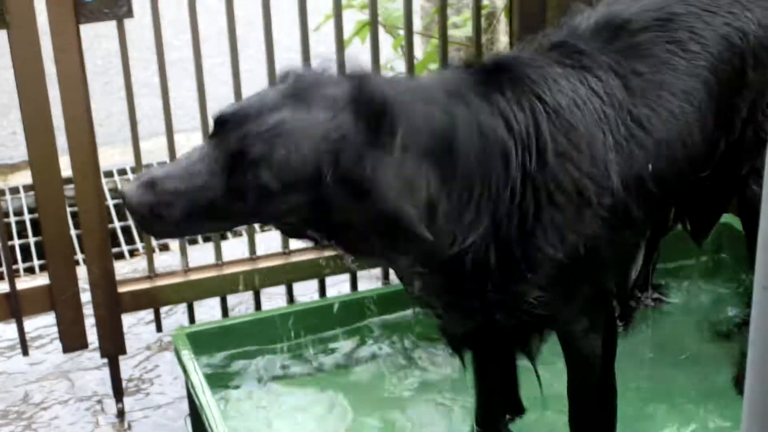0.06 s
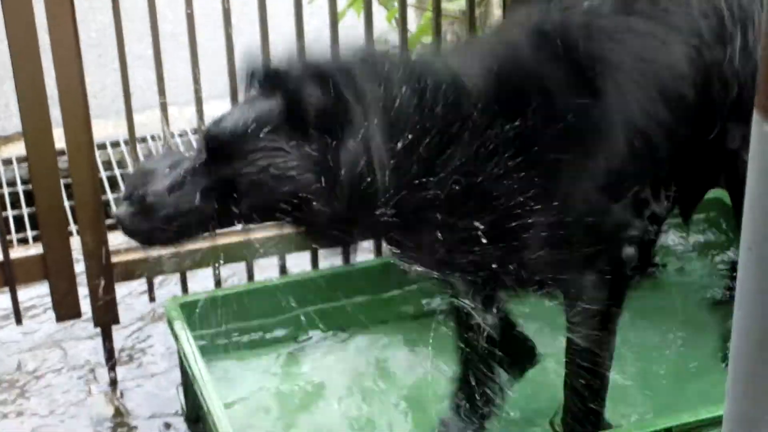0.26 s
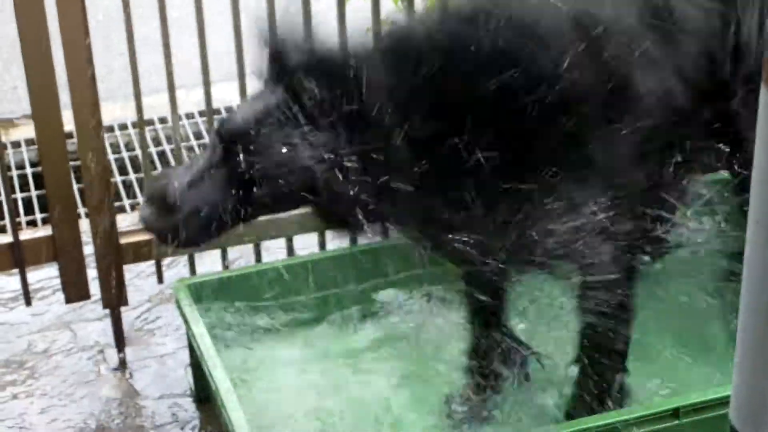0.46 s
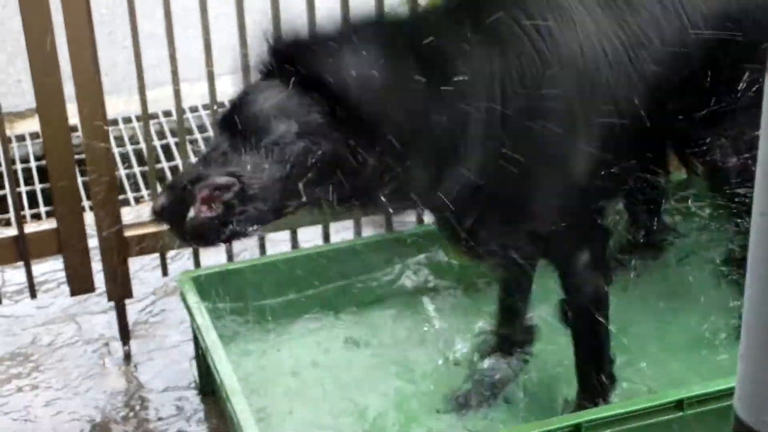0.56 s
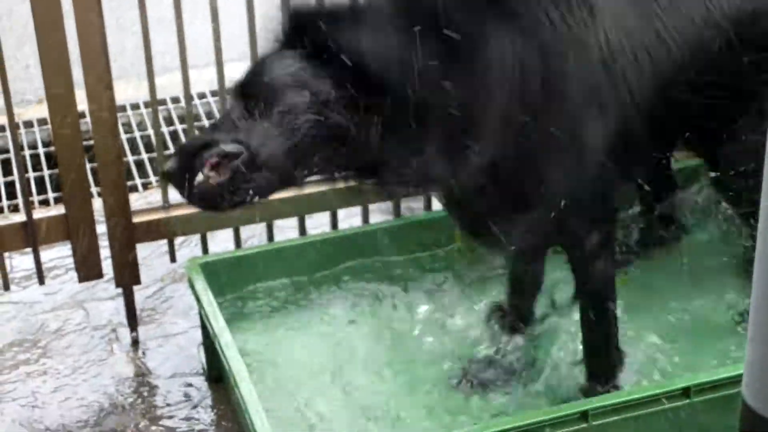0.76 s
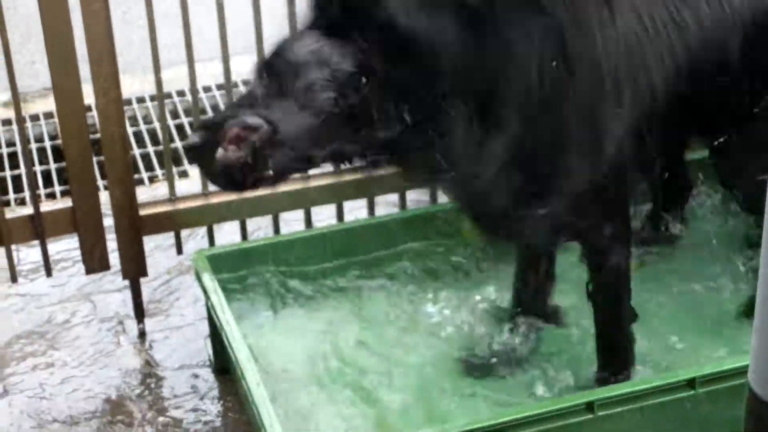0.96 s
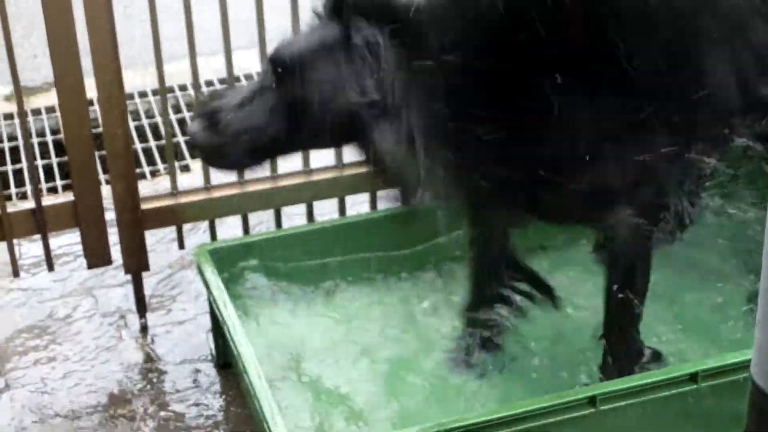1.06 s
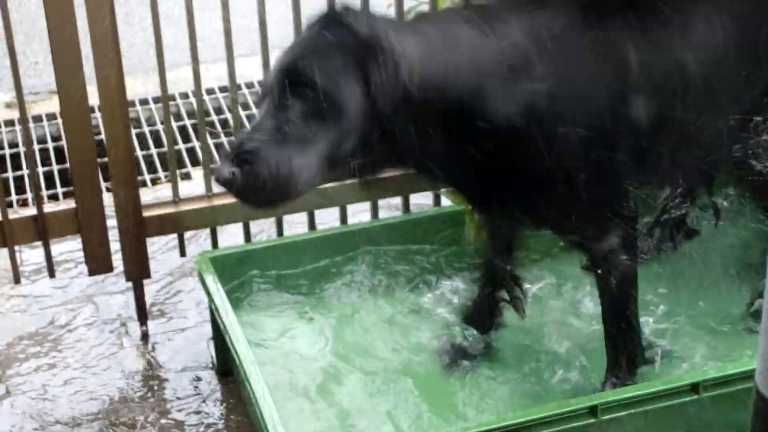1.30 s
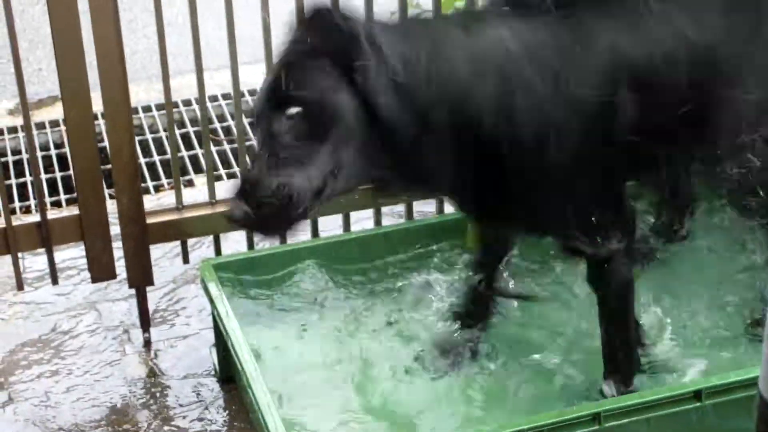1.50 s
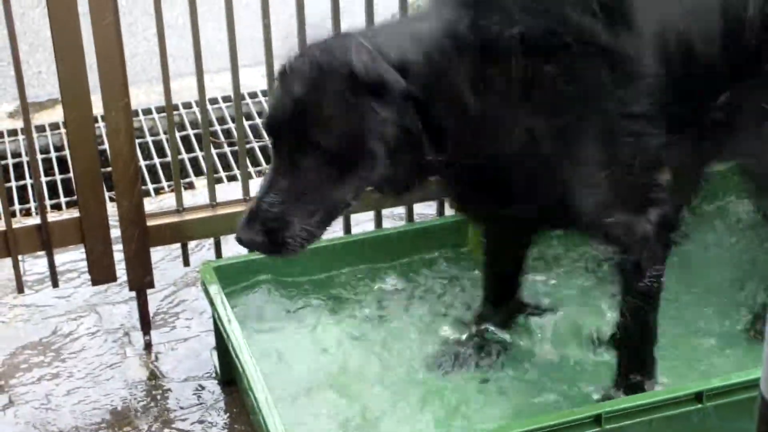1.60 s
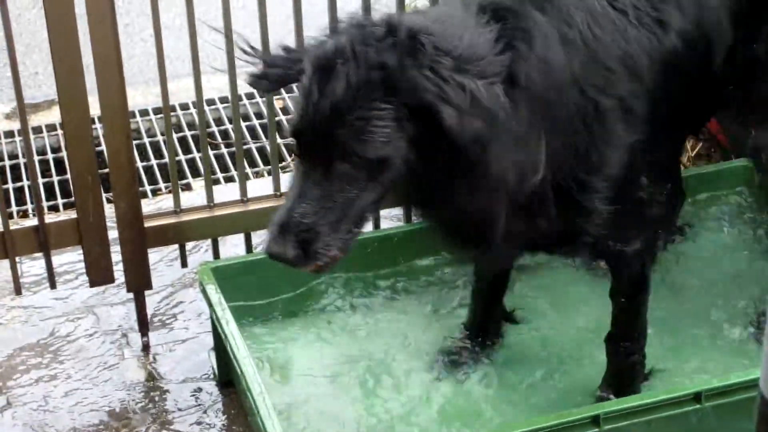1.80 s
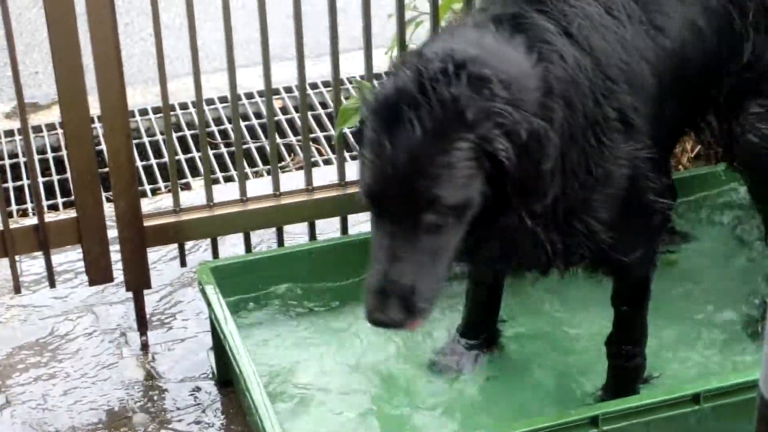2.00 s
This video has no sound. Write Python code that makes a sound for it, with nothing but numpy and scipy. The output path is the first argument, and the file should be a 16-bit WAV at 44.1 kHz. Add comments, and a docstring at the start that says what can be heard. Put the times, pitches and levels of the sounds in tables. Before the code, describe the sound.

A soaked dog shakes itself with quick wet slaps, spattering drops while tub water sloshes.

```python
"""A wet dog shakes itself while standing in a plastic tub of water in a small yard.
About ten times a second its coat swings round: the fur swishes and slaps, the skin flaps,
and the ears thump on some harder swings. Flung drops spatter all around and die away at the end.
The water sloshes and bubbles at its legs, and the walls and paving add a short echo."""
import sys
import numpy as np
from scipy import signal
from scipy.io import wavfile

SR = 44100
rng = np.random.default_rng(int(sys.argv[2]) if len(sys.argv) > 2 else 0)


def bounce(signal):
    """Save signal as a 16-bit WAV file at the path given by the first command-line argument."""
    frames = np.transpose(np.atleast_2d(signal))
    limited = np.clip(frames, -1, 1)
    pcm = np.round(limited * 32767).astype(np.int16)
    wavfile.write(sys.argv[1], SR, pcm)


N = 90404
T = np.arange(N) / SR

# swings of the coat: t/s, swish level/dB, slap level/dB, flap level/dB, basic fade time/s
COAT_SWINGS = [(0.234, -33.5, -45, -50.5, 0.012), (.318, -35, -47, -45.5, 0.0078),
               (.400, -35, -51, -37, 0.013), (0.499, -34, -37, -35, 0.015), (0.595, -36, -41.5, -40, 0.017),
               (.699, -34.5, -32.5, -42, 0.019), (0.8, -35, -39.5, -39, 0.019),
               (0.898, -34.5, -31.5, -40, 0.012), (0.987, -34.5, -31.5, -38.5, .017),
               (1.083, -35, -30.5, -34, 0.015), (1.179, -35.5, -32, -32, 0.012),
               (1.275, -35, -29, -27.5, 0.0086), (1.369, -34, -27.5, -32, 0.013),
               (1.463, -35.5, -34.5, -41, 0.025), (1.623, -30.5, -40, -54, 0.015)]
# tone (how strong each frequency is) of the hair's swish, wet slap and skin flap: f/Hz, level/dB
SWISH_SPECTRUM = [(300, -13), (1500, -9.5), (3000, 1.5), (5000, 2.5), (7500, 3.5), (10000, 4), (13000, 1.5),
                  (16000, -18)]
SLAP_SPECTRUM = [(150, -18.5), (420, -5), (580, -9), (850, 2), (1350, -1.5), (1900, -4), (2700, -7.5),
                 (4500, -12.5), (12000, -25)]
FLAP_SPECTRUM = [(30, -12), (65, 2), (100, -1), (150, -2), (320, 1), (450, 0.5), (580, -20), (1500, -38.5),
                 (5000, -74)]
# ears hitting the head: t/s, level/dB, f/Hz
EAR_THUMPS = [(.702, -28.5, 198), (1.074, -23.5, 246), (1.2677, -20.5, 233), (1.3655, -30, 430),
              (1.459, -23, 196)]
# tones that boom after a thump: f/Hz, level/dB relative to the thump, time to fade by 60 dB/s
EAR_BOOM = [(62.7, -12, 0.29), (140.4, -23.5, 0.39), (208.5, -13, 0.36), (308.4, -13, 0.12),
            (459, -15, 0.14)]
# loudness of the flung spray: t/s, level/dB
SPRAY_LEVELS = [(0, -49), (.1, -52), (.19, -50), (.25, -47.5), (.55, -43.5), (.75, -41), (1.1, -40.5),
                (1.32, -39), (1.55, -37.5), (1.66, -37), (1.73, -45), (1.82, -47.5), (1.92, -53.5),
                (2.05, -57.5)]
# tone of the spray: f/Hz, level/dB
SPRAY_SPECTRUM = [(300, -22.5), (1500, -1.5), (3000, 0.5), (5000, 1.5), (7500, 0.5), (10000, 1.5),
                  (13000, -1.5), (16000, -2)]
# clumps of water landing close by: t/s, level/dB, fade time/s
NEAR_SPLATS = [(0.031, -41.5, 0.0045), (.128, -45.5, 0.014), (.209, -54, .002), (0.232, -35.5, 0.0041),
               (.325, -31, .002), (.371, -42, .002), (.634, -31, 0.0024), (0.819, -26, 0.0019),
               (0.822, -27.5, 0.0037), (0.864, -34, .002), (1.030, -29, 0.0022), (1.136, -31, .003),
               (1.186, -26.5, 0.0027), (1.395, -30, 0.0053), (1.818, -39, 0.0022), (1.870, -42, 0.0028)]
# single bubbles in the tub: t/s, f/Hz, relative level/dB, fade time/s
TUB_BUBBLES = [(0.0, 2711, -40.5, 0.0043), (.02, 632, -45.5, 0.028), (.07, 550, -42.5, 0.013),
               (0.16, 4360, -45, 0.018), (.19, 3560, -41, .008), (0.205, 3260, -41, 0.012),
               (0.232, 3077, -35.5, 0.0094), (.251, 915, -36, 0.0083), (.273, 3900, -45, .009),
               (.341, 1043, -36, 0.0092), (.459, 963.5, -34, 0.018), (.673, 2370, -34, .007),
               (.828, 2126, -32.5, 0.0054), (.839, 1620, -35.5, 0.0062), (.845, 670, -37, 0.0085),
               (.862, 2890, -30, 0.0052), (0.9, 2680, -28.5, 0.0055), (.927, 1315, -28.5, 0.0037),
               (0.97, 1610, -35, .008), (1.029, 1000, -45, 0.012), (1.21, 950, -39, 0.013),
               (1.404, 1310, -29, 0.0041), (1.444, 1083, -34, 0.0093), (1.492, 865, -35.5, 0.0095),
               (1.55, 2406, -35.5, 0.0097), (1.558, 1070, -37, 0.0087), (1.63, 1282, -35, 0.015),
               (1.699, 1071, -41.5, 0.013), (1.782, 2880, -35, 0.0041), (1.79, 1994, -44.5, 0.0093),
               (1.806, 3480, -39.5, 0.0035), (1.837, 990, -42, 0.0063)]
# rise and fall of the water's slosh and low rumble: t/s, relative level/dB
SLOSH_LEVELS = [(0, -51.5), (.17, -55.5), (.3, -48.5), (.6, -48.5), (.85, -42), (1.3, -51.5), (1.52, -45),
                (1.66, -47), (1.75, -50.5), (1.84, -53.5), (1.93, -59), (2.05, -56)]
RUMBLE_LEVELS = [(0, -60.5), (.15, -52.5), (.32, -47.5), (.6, -49), (.9, -47.5), (1.2, -51), (1.56, -46),
                 (1.7, -55.5), (1.88, -55.5), (2.02, -51.5)]
# tone of the slosh and the rumble: f/Hz, level/dB
SLOSH_SPECTRUM = [(100, -12.5), (300, 1), (550, -1), (1000, 0.5), (1800, -2), (3000, -4), (6000, -17.5),
                  (14000, -17)]
RUMBLE_SPECTRUM = [(15, -8), (30, -7.5), (58, 3), (95, -10.5), (135, 1), (200, -9), (350, -11.5),
                   (600, -18.5), (3000, -45.5)]
# length of the yard's echo: f/Hz, time to fade by 60 dB/s
ECHO_TIMES = [(60, 0.7), (250, 0.27), (1000, 0.33), (4000, 0.19), (14000, 0.16)]
# stereo width: f/Hz, level/dB of the side (left minus right) relative to the mid (left plus right)
STEREO_WIDTH = [(50, -14), (1000, -19), (2500, -22), (4500, -11.5), (8000, -5.5), (13000, -2)]
# balance of the two microphones: f/Hz, level/dB of left relative to right
MIC_BALANCE = [(50, -1.4), (300, -1.7), (600, -3.5), (1400, -0.6), (4000, -0.4), (9000, 1.3), (16000, 2)]


def coat(swish_rise_s=0.0062, slap_rise_s=0.004, flap_rise_s=0.0046, lead_s=0.019):
    """Each swing throws a swish of wet hair, a slap and a low flap of skin."""
    swish = slap = flap = 0
    for s, swish_db, slap_db, flap_db, fade_s in COAT_SWINGS:
        lead = amp(-5) * swell(s, lead_s, lead_s)  # the fur starts to move well before the peak
        swish += amp(swish_db) * np.hypot(swell(s, swish_rise_s, fade_s), lead)
        slap += amp(slap_db) * np.hypot(swell(s, slap_rise_s, fade_s), 0.56 * lead)
        flap += amp(flap_db) * swell(s, flap_rise_s, 1.14 * fade_s)
    return (patter(swish, SWISH_SPECTRUM, per_s=4300, spread_db=-0.5, hiss_db=-21.5)
            + patter(slap, SLAP_SPECTRUM, per_s=2500, spread_db=3.5, hiss_db=-2)
            + patter(flap, FLAP_SPECTRUM, per_s=1600, spread_db=3.0, hiss_db=-3.5))


def ears():
    """An ear claps on the head: one push of air and a short boom."""
    out = np.zeros(N)
    for s, db, hz in EAR_THUMPS:
        phase_squared = (np.pi * hz * (T - s)) ** 2
        push = (1 - 2 * phase_squared) * np.exp(-phase_squared)
        age = np.maximum(T - s, 0)
        boom = sum(amp(ring_db - 60 * age / ring_s) * np.sin(2 * np.pi * ring_hz * age)
                   for ring_hz, ring_db, ring_s in EAR_BOOM)
        out += amp(db) * (push + boom)
    return out


def spatter():
    """Flung drops rain on the tub and the paving; a few clumps land close by."""
    splats = sum(amp(db) * swell(s, rise_s=0.00024, fade_s=fade_s) for s, db, fade_s in NEAR_SPLATS)
    return (patter(gain_curve(SPRAY_LEVELS), SPRAY_SPECTRUM, per_s=2900, spread_db=2.0, hiss_db=-5)
            + patter(splats, SWISH_SPECTRUM, per_s=12000, spread_db=-5.0, hiss_db=14))


def tub(fizz_per_s=120, low_hz=647, high_hz=5053, fade_cycles=10.8, tries=400):
    """Water churns round the legs: clear bubbles, a fizz of faint ones, slosh and a low rumble."""
    bubbles, fizz = np.zeros(N), np.zeros(N)
    for s, hz, db, fade_s in TUB_BUBBLES:
        add(bubbles, s, 1.34 * amp(db) * bubble(hz, fade_s))
    for when, pitch, softness, chance in rng.random((tries, 4)):
        if chance < fizz_per_s * T[-1] / tries:
            hz = low_hz * (high_hz / low_hz) ** pitch
            add(fizz, when * T[-1], amp(-14 * softness) * bubble(hz, fade_cycles / hz))
    churn = gain_curve(SLOSH_LEVELS)
    fizz = amp(-3) * churn * unit(fizz)
    slosh = patter(0.83 * churn, SLOSH_SPECTRUM, per_s=900, spread_db=3.5, hiss_db=0.5)
    rumble = patter(gain_curve(RUMBLE_LEVELS), RUMBLE_SPECTRUM, per_s=520, spread_db=3.0, hiss_db=5.5)
    return bubbles + fizz + slosh + rumble


def bubble(hz, fade_s, rise_s=0.00092, climb_per_s=1.33):
    """A bubble rings with a dying tone whose pitch climbs as it nears the surface."""
    t = np.arange(5000) / SR
    loudness = (1 - np.exp(-t / rise_s)) * np.exp(-t / fade_s)
    return loudness * np.sin(2 * np.pi * hz * t * (1 + climb_per_s * t / 2))


def yard(sound, delay_s=0.0075):
    """Sound bounces off the walls and paving: a short echo, wider in the treble."""
    hz, t, noise = signal.stft(rng.standard_normal((2, SR // 2)), SR, nperseg=256)
    fade = amp(-60 * t / look_up(ECHO_TIMES, hz)[:, None])
    echo = signal.istft(noise * fade, SR, nperseg=256)[1]
    echo *= np.arange(echo.shape[1]) / SR > delay_s  # silent until the first bounce
    echo /= np.linalg.norm(echo[0])
    mid, side = signal.fftconvolve(sound.mean(0)[None], echo, axes=1)[:, :N]
    side = colour(side, STEREO_WIDTH)
    return np.array([mid + side, mid - side])


def patter(gain, tone, per_s, spread_db, hiss_db):
    """Tiny hits of random size and direction over the hiss of fine mist, following a gain curve."""
    chance = rng.random(N)
    pan, hiss, hiss_side = rng.standard_normal((3, N))
    size = amp(spread_db * np.minimum(rng.exponential(1, N), 4))
    hits = unit(size * rng.choice([-1, 1], N) * (chance < per_s / SR))
    mid = colour(hits + amp(hiss_db) * hiss, tone)
    side = colour(hits * pan + amp(hiss_db) * hiss_side, tone)
    side = colour(side, STEREO_WIDTH)
    return gain * np.array([mid + side, mid - side]) / np.std(mid)


def swell(s, rise_s, fade_s):
    """A gain that grows to one at time s, then dies away."""
    return np.exp(-np.maximum((s - T) / rise_s, (T - s) / fade_s))


def amp(db):
    """Turns decibels into a gain, the number to multiply a sound by."""
    return 10 ** (np.asarray(db) / 20)


def unit(x):
    """Scales a sound to an average power of one."""
    return x / np.sqrt(np.mean(x ** 2) + 1e-20)


def look_up(points, hz):
    """Reads between a table's rows, with frequency spaced by octaves."""
    f, value = np.transpose(points)
    return np.interp(np.log(hz + 1), np.log(f + 1), value)


def gain_curve(points):
    """Joins a table's levels into a gain over time."""
    return amp(np.interp(T, *np.transpose(points)))


def colour(x, points, size=4096):
    """Gives a sound a table's tone, with a filter that rings only after each hit."""
    hz = abs(np.fft.fftfreq(size, 1 / SR))
    log_gain = np.log(amp(look_up(points, hz)))
    response = np.exp(np.conj(signal.hilbert(log_gain)))
    taps = np.fft.ifft(response).real[:size // 2]
    return signal.fftconvolve(x, taps)[:N]


def add(mix, s, sound):
    """Mixes a sound in at time s."""
    part = mix[max(round(s * SR), 0):][:len(sound)]
    part += sound[:len(part)]


def scene(echo_db=-13.5):
    """Dog, spray and tub, with the yard's echo behind them."""
    direct = coat() + ears() + spatter() + tub()
    return direct + amp(echo_db) * yard(direct)


def record(dry, cutoff_hz=15950):
    """The microphones lean right in the bass and left in the high treble; the very top is cut off."""
    left = colour(dry[0], [(hz, db / 2) for hz, db in MIC_BALANCE])
    right = colour(dry[1], [(hz, -db / 2) for hz, db in MIC_BALANCE])
    lowpass = signal.firwin(511, cutoff_hz, window=("kaiser", 9), fs=SR)
    return signal.oaconvolve(np.array([left, right]), lowpass[None], "same")


dry = scene()
out = record(dry)
bounce(out)
```